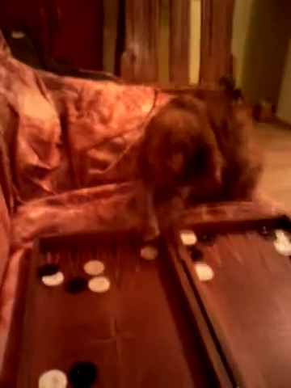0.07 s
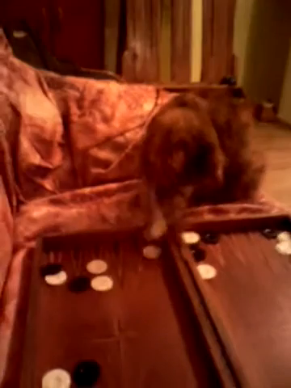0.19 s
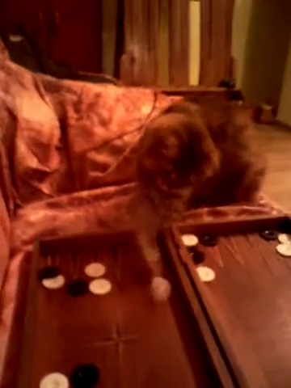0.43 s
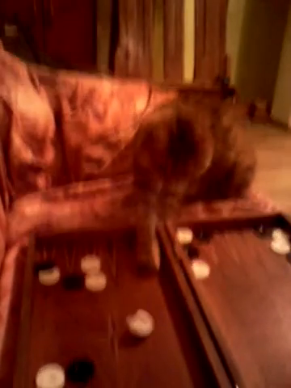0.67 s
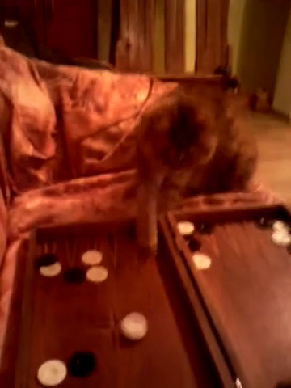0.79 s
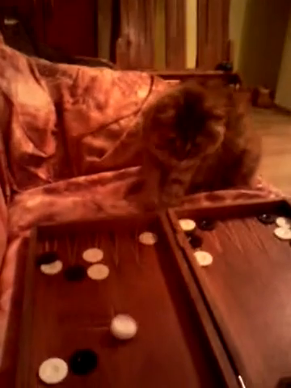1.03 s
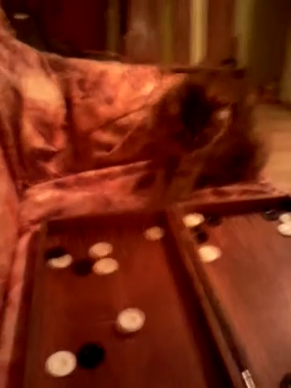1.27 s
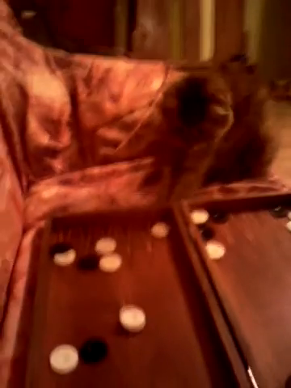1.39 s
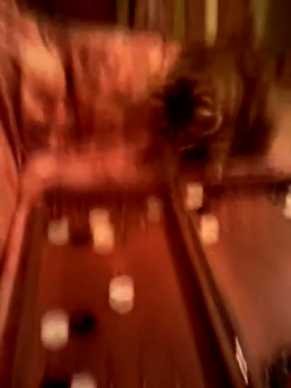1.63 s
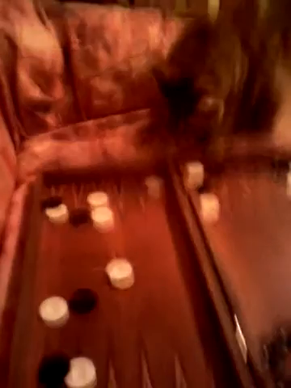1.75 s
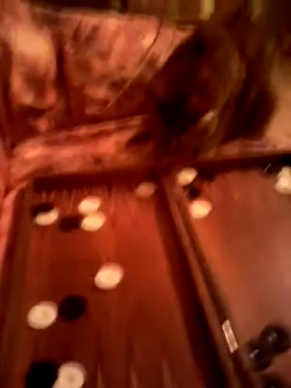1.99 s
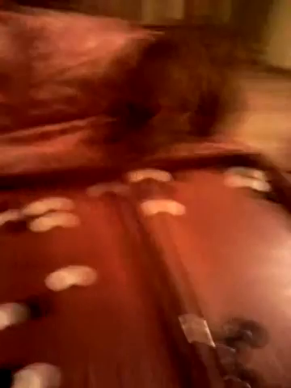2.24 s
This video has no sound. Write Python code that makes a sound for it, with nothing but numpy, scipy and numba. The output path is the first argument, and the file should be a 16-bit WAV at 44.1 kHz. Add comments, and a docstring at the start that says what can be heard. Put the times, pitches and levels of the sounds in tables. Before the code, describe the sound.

A game checker clacks on a hollow wooden board right at the start, followed by two light taps and a soft thud of a cat's paw around 0.2 seconds. At 0.4 seconds it drops and bounces sharply. From 0.6 seconds it rolls on its rim with a chattering rattle, wobbling faster until it stops near 2.3 seconds. The sound is close, in a small quiet room.

```python
"""A small, quiet room; one microphone close to a hollow wooden game board, where a cat paws a checker.
First comes a clack, then two light taps, with soft thuds of the paw on the wood. At 0.42 s the checker
drops and bounces, each landing ringing the board and the checker's own high note. From 0.6 s it rolls
round on its rim, chattering over the grain and wobbling faster and faster, until it stops near 2.3 s.
Nearby surfaces and the room's short tail answer throughout."""
import sys
import numpy as np
from scipy import signal
from scipy.fft import rfft, irfft
from scipy.io import wavfile
from numba import njit

SR = 44100
rng = np.random.default_rng(int(sys.argv[2]) if len(sys.argv) > 2 else 0)


def transcribe(u):
    """Save the signal u as a 16-bit wav file named by the first command-line argument.

    u: samples, shape (n,) or (channels, n), limited to [-1, 1]; the rate is SR.
    q: integer samples, one column per channel.
    """
    v = np.clip(np.atleast_2d(u).T, -1, 1)
    q = np.round(v * 32767).astype(np.int16)
    wavfile.write(sys.argv[1], SR, q)


N = 103635
ROLL_START_S, ROLL_STOP_S = 0.6, 2.325

# modes of the checker (frequency [Hz], gain [dB], t60 [s])
CHECKER_MODES = [(6340, -24.5, 0.042), (6095, -2, 0.024), (6227, -20, 0.053), (6040, -31.5, 0.0027),
                 (8900, -46.5, 0.0027)]
# spectrum of the rolling rim's push on the wood (frequency [Hz], gain [dB])
RIM_PUSH = [(30, -38), (150, 14), (310, -1), (420, 13.5), (600, 1.5), (1300, -15.5), (2000, 0), (2500, -7),
            (3500, -18), (4600, -35), (6500, -36), (8500, -51), (16000, -74)]


def undb(db):
    """Decibels to gain."""
    return 10 ** (np.asarray(db) / 20)


def on_log(hz, points, values):
    """Straight lines on a log-frequency axis."""
    return np.interp(np.log(np.maximum(hz, 1)), np.log(points), values)


def colour(x, points, size=4096):
    """Minimum-phase filter with a gain curve of (frequency [Hz], gain [dB]) points."""
    hz, db = np.array(points).T
    gain = undb(on_log(np.fft.rfftfreq(size, 1 / SR), hz, db))
    cepstrum = irfft(np.log(gain))
    cepstrum[1:size // 2] *= 2
    cepstrum[size // 2 + 1:] = 0
    return signal.fftconvolve(x, irfft(np.exp(rfft(cepstrum))))[:len(x)]


def fade(t60):
    """Gain per sample of a decay that loses 60 dB in t60 seconds."""
    return np.exp(-np.log(1000) / (t60 * SR))


def ring(x, hz, t60):
    """One damped mode driven by x."""
    pole = fade(t60) * np.exp(2j * np.pi * hz / SR)
    return signal.lfilter([1], [1, -pole], x + 1e-18).imag


def pulses(times, sizes):
    """A train of instant blows."""
    out = np.zeros(N)
    np.add.at(out, np.clip((times * SR).astype(int), 0, N - 1), sizes)
    return out


def burst(force, t60):
    """A short noisy ring after each blow, standing for many quickly damped modes."""
    energy = signal.lfilter([1], [1, -fade(t60) ** 2], force ** 2 + 1e-18)
    return np.sqrt(energy) * rng.choice([-1, 1], N)


@njit
def moving_band(x, hz, width_hz):
    """State-variable band-pass whose centre follows hz."""
    y, band_state, low_state = np.empty(len(x)), 0., 0.
    for i in range(len(x)):
        step, damping = np.tan(np.pi * hz[i] / SR), width_hz / hz[i]
        band = (band_state + step * (x[i] - low_state)) / (1 + step * (step + damping))
        band_state = 2 * band - band_state
        low_state += 2 * step * band
        y[i] = damping * band
    return y


def board(force):
    """The hollow board rings in its modes, which alternate in polarity."""
    # modes of the board (frequency [Hz], gain [dB], t60 [s])
    modes = [(317, -39.5, 0.16), (381.6, -25, 0.034), (593.5, -19.5, 0.038), (639, -15, 0.029),
             (1001, -19.5, 0.029), (1836, -13.5, 0.048), (2198, -9, 0.022), (2360, -7.5, 0.025),
             (2670, -2, 0.019), (3234, -10, 0.047), (3507, -0.5, 0.0067), (3630, -2.5, 0.019),
             (4203, -4, 0.0054), (5590, -10.5, 0.004)]
    return sum((-1) ** k * undb(db) * ring(force, hz, t60) for k, (hz, db, t60) in enumerate(modes))


def clacks(landings):
    """Each landing cracks sharply and shares its energy between board and checker."""
    # spectrum of a landing's short push (frequency [Hz], gain [dB])
    blow_colour = [(30, -32), (150, -2), (350, -4.5), (600, 2.5), (1100, -3.5), (2000, -3.5), (4000, 2),
                   (6800, 3.5), (8500, 1), (16000, -17)]
    # spectrum of a hard contact (frequency [Hz], gain [dB])
    crack_colour = [(30, -26), (150, -14), (600, -6), (2500, 4), (4500, -2.5), (6600, 2.5), (8000, -21),
                    (10500, -15), (14000, -30.5), (16500, -25)]
    at, board_db, checker_db, crack_db = np.array(landings).T
    wood = board(pulses(at, undb(board_db - 6)))
    blow = pulses(at, undb(checker_db - 2))
    checker = sum(undb(db) * ring(blow, hz, t60) for hz, db, t60 in CHECKER_MODES)
    crack = burst(pulses(at, undb(crack_db - 3)), t60=0.014)
    return colour(wood + checker, blow_colour) + colour(crack, crack_colour)


def paw_thuds():
    """The soft paw lands on the board with a low thud."""
    # touches of the paw (time [s], level [dB])
    touches = [(0.004, -58.5), (0.23, -56)]
    at, db = np.array(touches).T
    return ring(pulses(at, undb(db)), hz=118, t60=0.11)


def taps():
    """The pawed checker clicks thinly: a brief note, a bright snap and a light knock of the board."""
    # light taps (time [s], note level [dB], note pitch [Hz], snap level [dB])
    touches = [(0.1654, -33, 2840, -72), (0.2341, -21.5, 2490, -3)]
    # a touch through the soft paw has little treble (frequency [Hz], gain [dB])
    soft_colour = [(30, -21), (1000, -8.5), (2900, -1.5), (5000, -4), (8000, -22), (16000, -33)]
    # spectrum of a light snap (frequency [Hz], gain [dB])
    snap_colour = [(30, -37), (300, -55), (700, -39), (1050, -15), (1500, -21), (2700, -3), (3700, -0.5),
                   (4700, -10.5), (6200, 8.5), (7000, -6.5), (7900, -28), (9100, -10), (11000, -32.5),
                   (16000, -43)]
    at, _, _, snap_db = np.array(touches).T
    notes = sum(ring(pulses(np.array([s]), undb(db)), hz, t60=0.014) for s, db, hz, _ in touches)
    knock = ring(pulses(at, undb(snap_db - 30)), hz=1028, t60=0.0084)
    snap = burst(pulses(at, undb(snap_db)), t60=0.0089)
    return colour(notes, soft_colour) + knock + colour(snap, snap_colour)


def wobble(t, stop_fade_s=0.0033, lag_turns=0.036):
    """How hard the rim presses, and the swing (0-1) of its contact point, once round per wobble."""
    # hardest contact of each wobble (time [s], level [dB], half length [s])
    wobbles = [(0.664, 1, 0.015), (0.785, -6.5, 0.016), (0.848, -5.5, 0.039), (0.874, -31, 0.024),
               (0.963, 0, 0.022), (1.021, -7, 0.0076), (1.075, 0.5, 0.02), (1.18, 0, 0.022),
               (1.249, -0.5, 0.012), (1.293, -2, 0.024), (1.385, -1, 0.022), (1.486, 0.5, 0.029),
               (1.572, -0.5, 0.021), (1.647, -2.5, 0.026), (1.678, -3, 0.017), (1.712, -7, 0.016),
               (1.75, -5, 0.016), (1.781, -6, 0.024), (1.832, -3.5, 0.026), (1.908, 0, 0.024),
               (1.971, -2, 0.021), (2.037, 0, 0.019), (2.088, 0.5, 0.014), (2.161, -3, 0.019),
               (2.21, -2.5, 0.0079), (2.251, -6.5, 0.017), (2.275, -6.5, 0.047)]
    between = undb(np.interp(t, [ROLL_START_S, ROLL_STOP_S], (-33.5, -7)))
    swell_power = sum(undb(db) ** 2 * np.exp(-((t - s) / half) ** 2) for s, db, half in wobbles)
    gate = (t > ROLL_START_S) * np.clip((ROLL_STOP_S - t) / stop_fade_s, 0, 1)
    press = np.sqrt(between ** 2 + swell_power) * gate
    turn_times = np.append(np.array(wobbles)[:, 0], ROLL_STOP_S)
    turns = np.interp(t, turn_times, np.arange(len(turn_times)))
    return press, .5 + .5 * np.sin(2 * np.pi * (turns - lag_turns))


def chatter(ticks_per_s=1300, scatter_db=3.0):
    """Uneven ticks of the rim on the wood grain."""
    count = int(N / SR * ticks_per_s)
    slip, size, side = rng.standard_normal((count, 3)).T
    at = (np.arange(count) + slip / 2) / ticks_per_s
    return pulses(at, undb(scatter_db * np.clip(size, -2, 2)) * np.sign(side))


def checker_ring(ticks, bumps, press, swing, age):
    """The rim excites the checker's modes and a gliding ring that grows as the checker flattens."""
    # share of the rolling ticks that reaches the checker's modes (frequency [Hz], gain [dB])
    rim_contact = [(30, -49), (2000, -16), (4600, -11.5), (5600, 1), (6300, 0.5), (7200, -12.5),
                   (8300, -24.5), (9700, -3.5), (11500, -17), (16000, -29)]
    modes = sum(undb(db) * ring(ticks * press * rng.uniform(0, 1.74, N) + bumps, hz, t60)
                for hz, db, t60 in CHECKER_MODES)
    glide = moving_band(chatter() * press, hz=5727 + 590 * swing, width_hz=160.)
    return colour(modes * undb(-34.5 + 0.77 * age) + glide * undb(-22.5 + 9 * age), rim_contact)


def wood_rattle(force, age, fall_db_per_s=3.5):
    """The board rings grittily under the rim, responding less as the checker leans over."""
    # spectrum of the rim's grit (frequency [Hz], gain [dB])
    grit_colour = [(30, -27.5), (120, -23.5), (220, -4), (330, 8.5), (500, -1), (800, 3), (1500, 2),
                   (2000, 3.5), (3300, 7), (4500, -6), (6100, -1), (8200, -47), (9800, -42), (12000, -71),
                   (16000, -54)]
    body = undb(-43) * board(colour(force, RIM_PUSH))
    grit = undb(-36.5) * colour(burst(force, t60=0.0092), grit_colour)
    return (body + grit) * undb(-fall_db_per_s * age)


def wood_knocks(press, swing, age, rise_db_per_s=2):
    """Wood resonances rise and fall as the contact point goes round."""
    # shifting resonances (lowest centre [Hz], sweep [Hz], width [Hz], gain [dB])
    bands = [(1840, 600, 94, -15.5), (2560, 300, 110, -32), (3044, 730, 53, -15.5)]
    force = colour(chatter() * press, RIM_PUSH)
    knocks = sum(undb(db) * moving_band(force, hz + sweep * swing, float(width))
                 for hz, sweep, width, db in bands)
    return knocks * undb(rise_db_per_s * age)


def board_drum(ticks, press, hz=339, t60=0.03):
    """The hollow board drums under the rolling weight, only loosely following the pressure."""
    drum = ring(ring(ticks * press ** 0.26, hz, t60), hz, t60)
    return undb(-56) * drum / drum.std()


def rim_fizz(ticks, press):
    """A fine fizz that comes out only at the hardest contacts."""
    # spectrum of the fizz (frequency [Hz], gain [dB])
    fizz_colour = [(30, -30), (5000, -3), (7000, 14), (8500, -5), (9600, 2.5), (10900, -4), (12500, -25),
                   (16000, -32)]
    return undb(-51.5) * colour(burst(ticks * press ** 4.8, t60=0.0042), fizz_colour)


def rolling():
    """The rim chatters over the grain, harder once in each wobble, and strikes bumps on its way."""
    # bumps under the rim (time [s], level over an ordinary tick [dB])
    bump_hits = [(0.6420, 10), (0.6649, 17), (0.8060, 0), (0.8280, 11.5), (0.9355, -1), (0.9694, 12.5),
                 (1.0543, 9.5), (1.1678, 1), (1.2820, 10.5), (1.3652, 2), (1.559, 6), (1.7410, 10.5),
                 (1.8620, 11.5), (2.0160, 10.5), (2.0827, 14), (2.3170, 11)]
    t = np.arange(N) / SR
    age = t - ROLL_START_S
    press, swing = wobble(t)
    ticks = chatter()
    bump_at, bump_db = np.array(bump_hits).T
    bumps = pulses(bump_at, undb(bump_db))
    checker = checker_ring(ticks, bumps, press, swing, age)
    wood = wood_rattle(ticks * press + undb(-2.5) * bumps, age)  # bumps drive the board less
    return checker + wood + wood_knocks(press, swing, age) + board_drum(ticks, press) + rim_fizz(ticks, press)


def reflections(x):
    """Nearby surfaces return a few echoes to the microphone."""
    # early echoes (delay [s], gain [dB])
    echoes = [(.0035, -17), (.0075, -17.5), (0.0164, -17.5), (.024, -25.5)]
    # tone of the echoes (frequency [Hz], gain [dB])
    echo_colour = [(100, 3), (2500, -0.5), (6300, 2), (9000, -24), (16000, -10)]
    delay, db = np.array(echoes).T
    response = colour(pulses(delay, undb(db))[:SR], echo_colour)
    return signal.fftconvolve(x, response)[:N]


def room(x, build_s=0.0033):
    """The small room's diffuse tail, which dies soonest around 10 kHz."""
    # bands of the tail (frequency [Hz], gain [dB], t60 [s])
    bands = [(98, -7.5, .4), (493, -6, .38), (2680, -10, 0.45), (6100, -12, 0.44), (9900, -18, 0.16),
             (16000, -13, 0.35)]
    t = np.arange(SR) / SR
    centres, freqs = np.array(bands)[:, 0], np.fft.rfftfreq(SR, 1 / SR)
    spectrum = rfft(rng.standard_normal(SR))
    response = np.zeros(SR)
    for share, (_, db, t60) in zip(np.eye(len(bands)), bands):
        noise = irfft(spectrum * on_log(freqs, centres, share))
        envelope = fade(t60) ** (t * SR) * (1 - np.exp(-t / build_s))
        response += undb(db) * noise * envelope / np.linalg.norm(envelope)
    return signal.fftconvolve(x, response)[:N]


def scene():
    """Clacks, taps and the roll reach the microphone over faint room tone."""
    # landings (time [s], board drive [dB], checker drive [dB], crack drive [dB])
    landings = [(0.0042, -24.5, -25.5, -16), (0.4244, -0.5, -27, 1), (0.4406, -24, -4, -5.5),
                (0.452, -14, -11, -15), (0.5170, -8.5, -6.5, -6), (0.5373, -22.5, -22, -13),
                (0.556, -18, -27, -22.5), (0.5723, -24.5, -73, -46)]
    # an opening clack heard only as the room's tail (columns as in landings)
    tail_only = [(0.0, -19.5, -11, -14)]
    # spectrum of the room tone (frequency [Hz], gain [dB])
    air_colour = [(30, -15), (70, -6), (110, 0), (300, -8), (1000, -14), (4000, -22), (8000, -39),
                  (16000, -53)]
    air = colour(rng.standard_normal(N), air_colour)
    direct = paw_thuds() + taps() + clacks(landings) + rolling()
    tail = room(direct + clacks(tail_only))
    return (direct + reflections(direct) + tail + undb(-75) * air / air.std())[None]


def record(dry, top_hz=16200):
    """The microphone clips at full scale and cuts the top."""
    low_pass = signal.ellip(8, .2, 70, top_hz, fs=SR, output="sos")
    return signal.sosfilt(low_pass, np.clip(dry, -1, 1))


dry = scene()
out = record(dry)
transcribe(out)
```